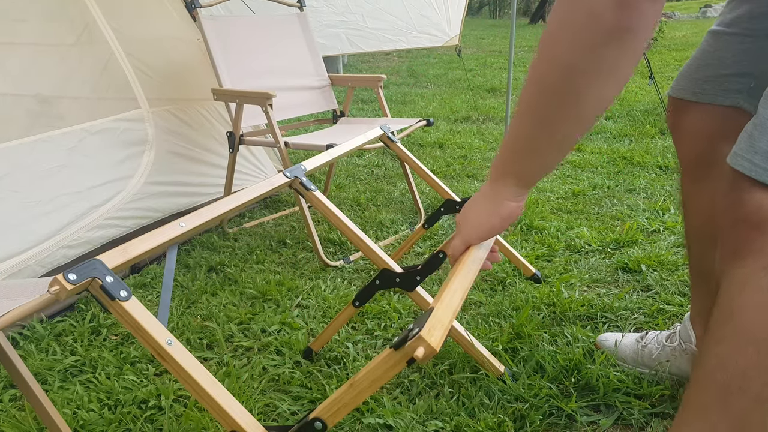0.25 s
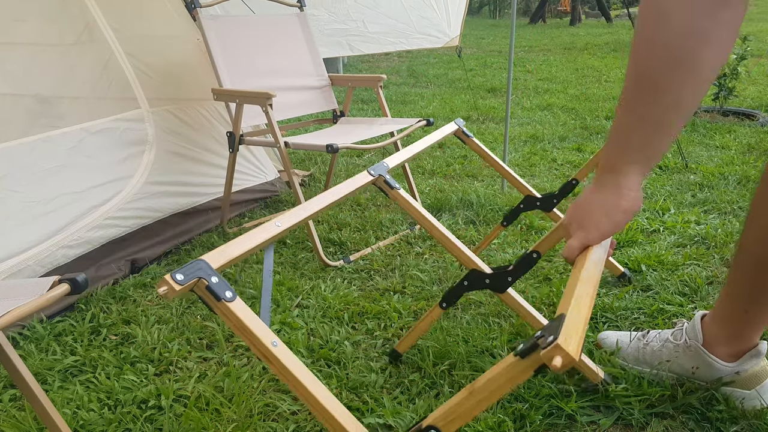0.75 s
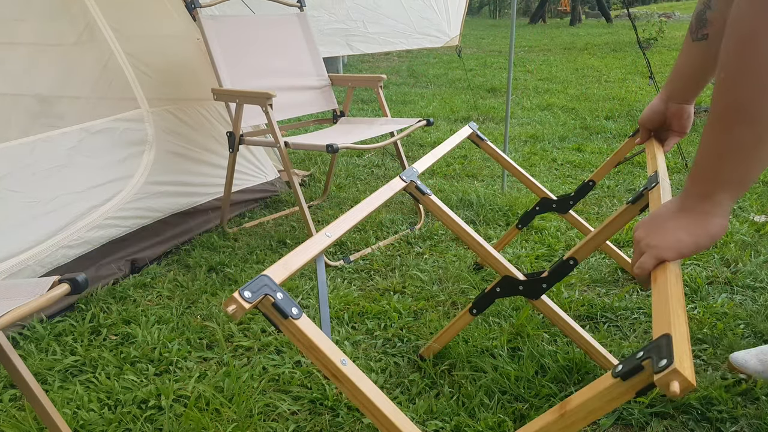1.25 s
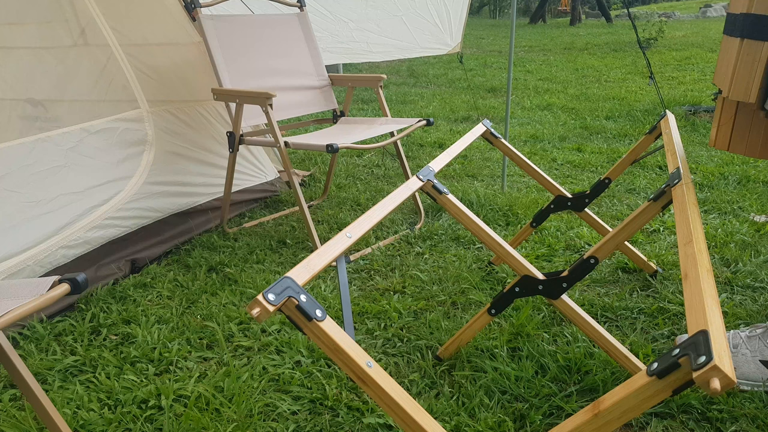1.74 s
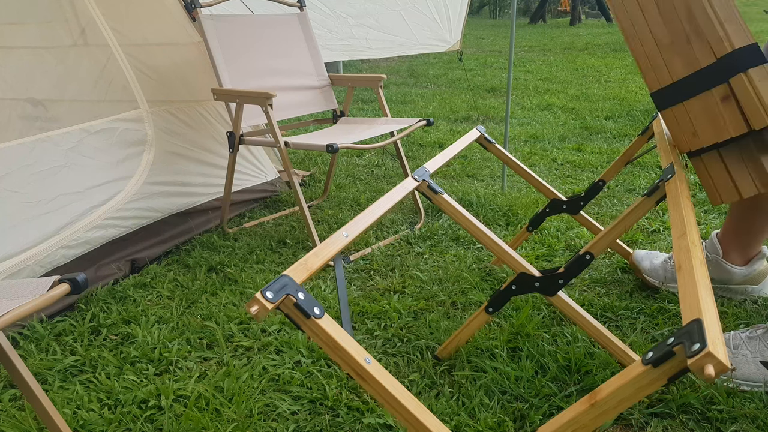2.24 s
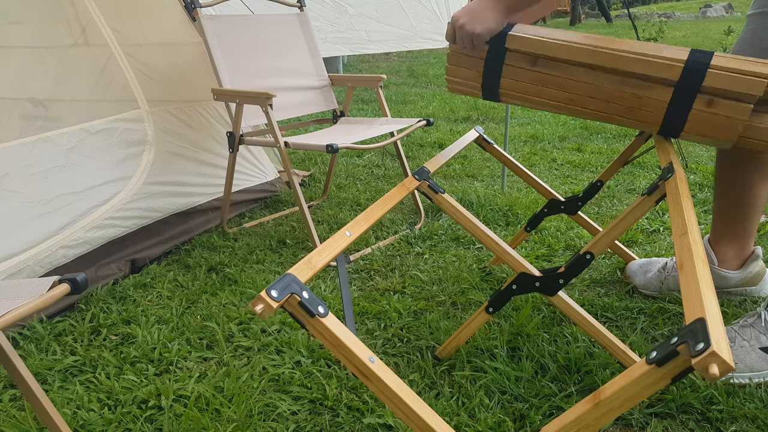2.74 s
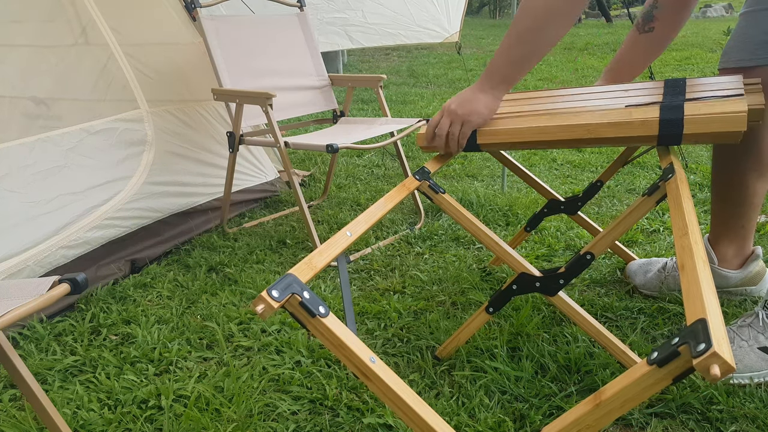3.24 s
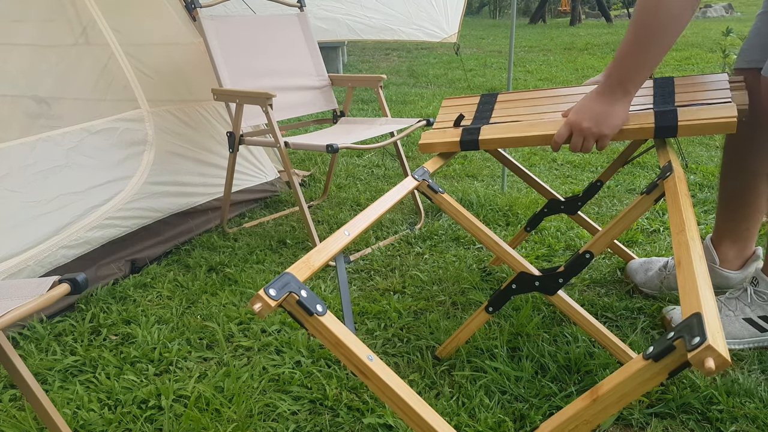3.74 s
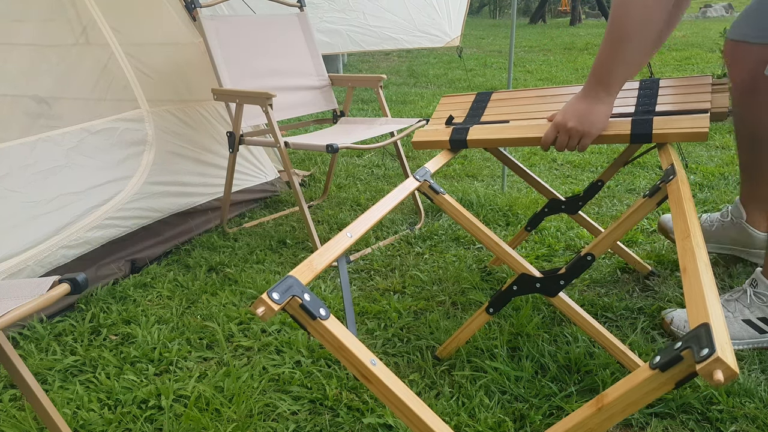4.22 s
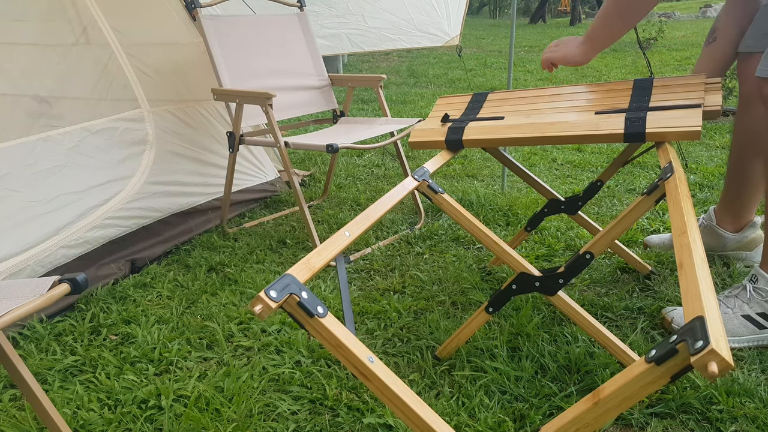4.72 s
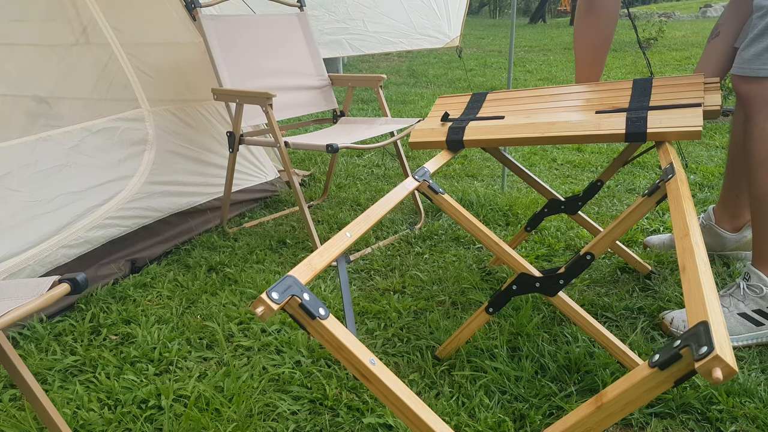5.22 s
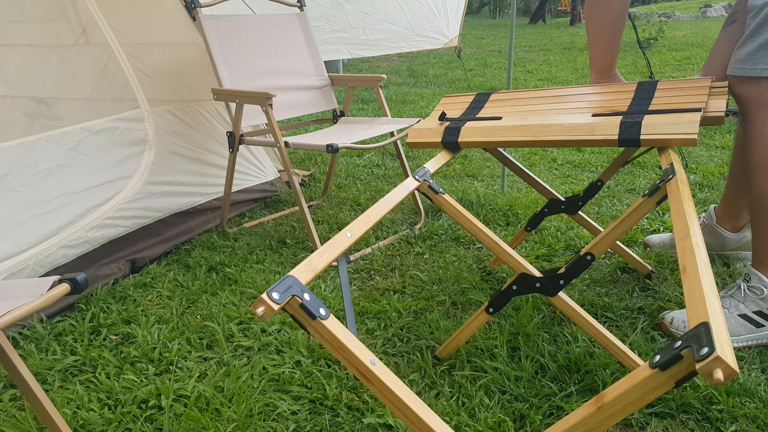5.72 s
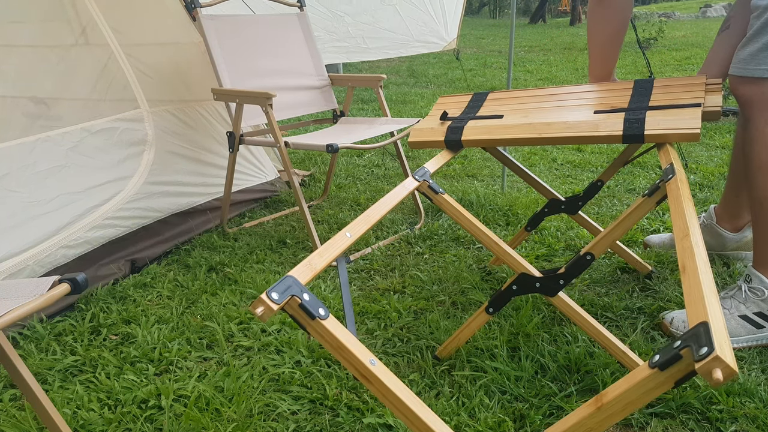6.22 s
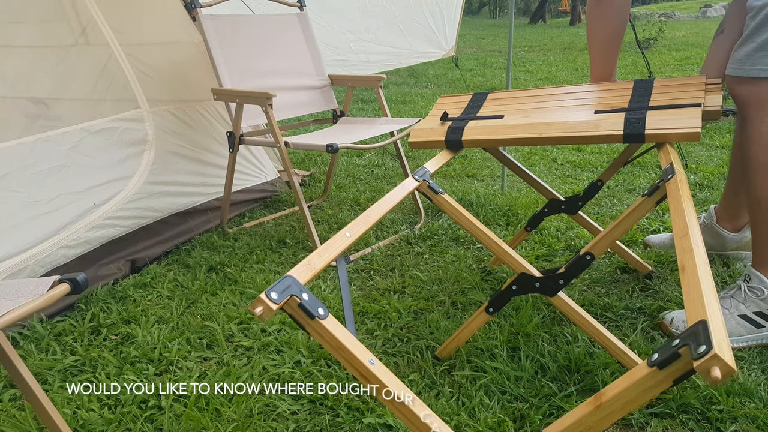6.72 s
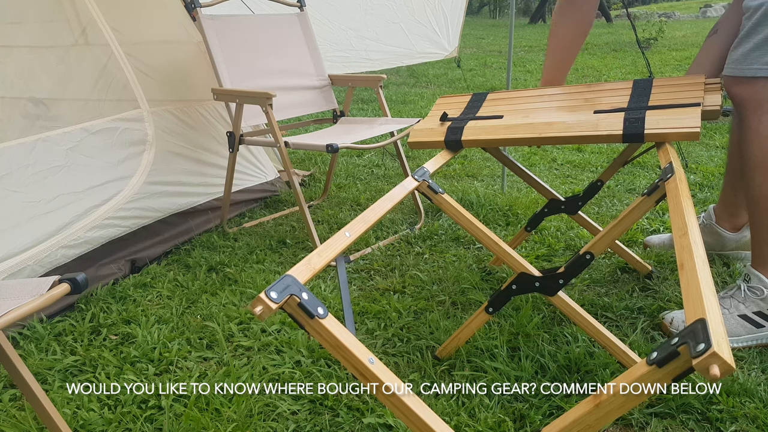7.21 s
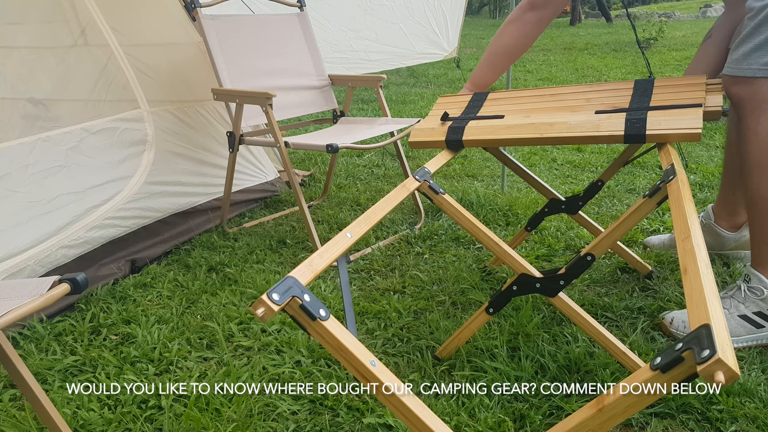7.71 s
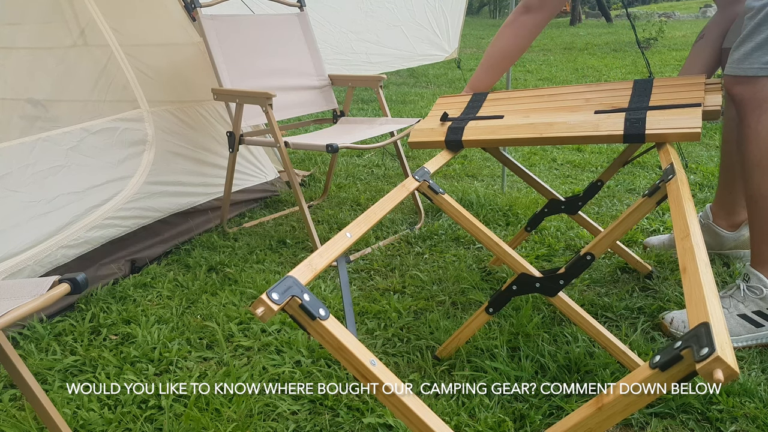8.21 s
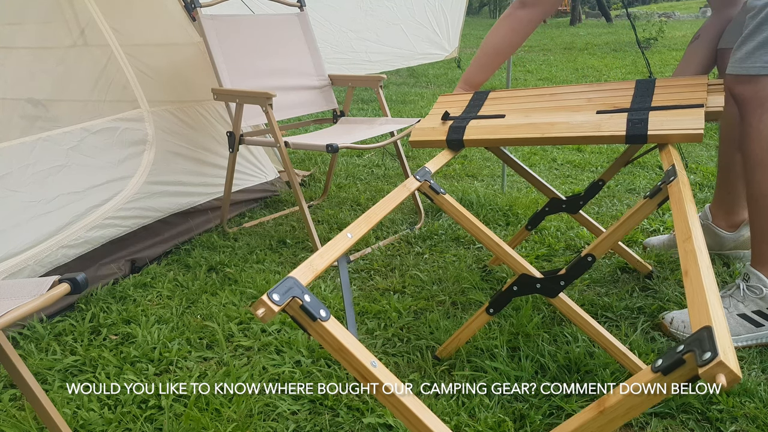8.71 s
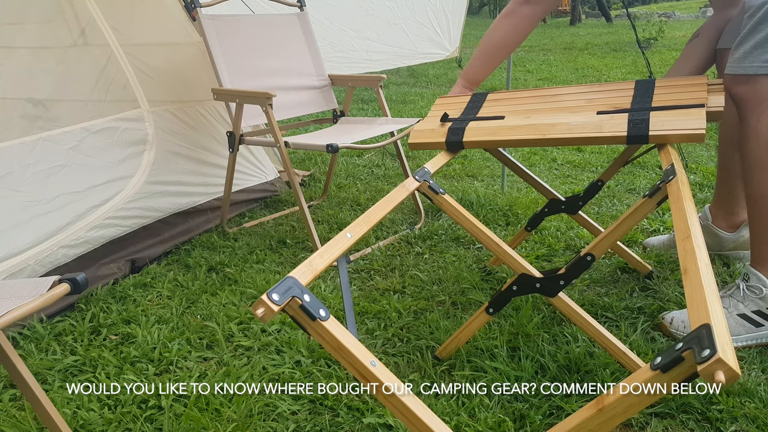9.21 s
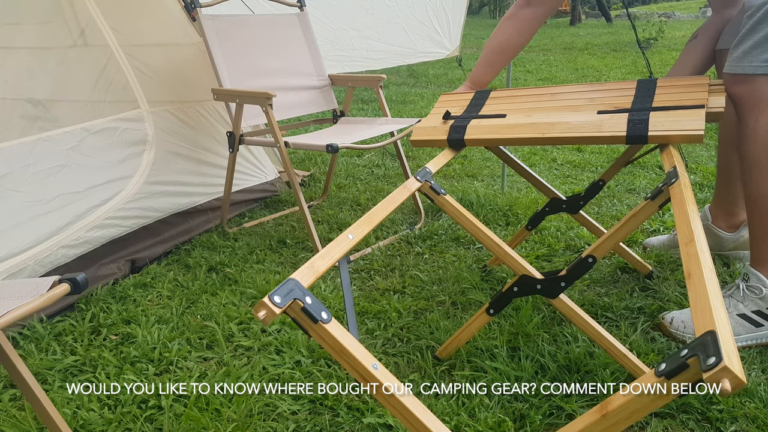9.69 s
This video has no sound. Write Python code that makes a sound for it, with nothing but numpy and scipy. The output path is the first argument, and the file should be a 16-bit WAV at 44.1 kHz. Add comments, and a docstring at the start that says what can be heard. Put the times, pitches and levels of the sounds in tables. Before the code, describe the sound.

Close stereo pickup on an open lawn. Legs swish through grass with small ticks and a faint hinge rub, then a strapped bundle of wooden slats rattles and lands on a wooden frame with hard, dry clacks. It scrapes and knocks as it is adjusted, then only small taps remain while wind rumbles on the microphone and an insect rasps far off.

```python
"""A wooden folding table is set up on a lawn: a strapped bundle of slats knocks, clatters and slides on
the rails, each contact ringing random touches or slips through the modes of the wood. Coloured clicks make
the legs' swish through the grass, with ticks, dull thuds in the turf, rubbing hinges and a palm on the rail.
Slow random swells of low noise buffet the two microphone ports, a far insect rasps in bouts of filtered
noise, and a faint trill, a thin wavering tone and still air lie behind."""
import sys
import numpy as np
from scipy import signal
from scipy.fft import rfft, irfft, next_fast_len
from scipy.io import wavfile
from scipy.ndimage import uniform_filter1d, map_coordinates

SR = 44100
rng = np.random.default_rng(int(sys.argv[2]) if len(sys.argv) > 2 else 0)


def transcribe(signal):
    """Save signal, clipped to [-1, 1], as a 16-bit WAV file at the path in sys.argv[1]."""
    frames = np.atleast_2d(signal).T
    limited = np.clip(frames, -1, 1)
    pcm = np.round(limited * 32767).astype(np.int16)
    wavfile.write(sys.argv[1], SR, pcm)


N = 438794

# Knocks of slats and frame. Each row: start in seconds, level in dB (rms over 20 ms), contact hardness in Hz,
# low thump in dB, clack of loose slats in dB, chatter time in seconds.
BLOWS = [(0.558, -47.5, 4930, 3.5, -10, 0.0093), (1.617, -49, 1580, 2.5, 2, 0.0075),
         (2.054, -53, 2150, 37, 5, 0.0011), (2.108, -44, 835, -9, 4, 0.0059),
         (2.133, -40, 1740, -10, 0, .004), (2.173, -38.5, 2330, -18, -3, .0004),
         (2.201, -25, 9150, -5, -10, 0.00027), (2.209, -28.5, 5000, 1, -5, 0.00092),
         (2.245, -33, 2030, 2, -1, 0.0044), (2.276, -34.5, 1400, 12, -3, 0.0099),
         (2.304, -33, 1390, 2.5, 0, 0.0035), (2.345, -38, 1840, -10, 1, 0.005),
         (2.359, -29.5, 3360, 4, -8, 0.0005), (2.405, -42, 1130, 22, -8, 0.0041),
         (2.464, -42, 1046, 12, -11, 0.0017), (2.536, -36, 1660, 16, -16.5, 0.0015),
         (2.647, -41.5, 1560, 20, -16, 0.0025), (2.678, -38.5, 2006, 6.5, 5, 0.0017),
         (2.767, -38.5, 1530, 11.5, 2.5, 0.0023), (2.866, -18.5, 5500, 1.5, -2, .0045),
         (2.883, -19, 8340, -7.5, 7, 0.0026), (2.91, -32.5, 5760, 12, -9, 0.00054),
         (2.961, -24, 8450, -5, 2, 0.0039), (2.971, -32, 6850, -10, -10, 0.0014),
         (3.133, -43, 2200, -5.5, -0.5, 0.00029), (3.181, -50.5, 1060, 32, 0, 0.0019),
         (3.22, -33.5, 2340, 5.5, -1, 0.0024), (3.239, -36.5, 2000, 12, -13, 0.0072),
         (3.337, -52.5, 840, 8, -6, 0.0003), (3.484, -46, 1300, 3, -5, 0.0024),
         (3.505, -41, 1140, 4.5, -1, 0.00067), (3.816, -33.5, 1340, -16, -3.5, 0.00069),
         (3.904, -39.5, 1670, -2.5, 1, 0.0037), (4.019, -34.5, 1100, -8.5, -8.5, 0.0011),
         (4.106, -56.5, 910, 12.5, 8, 0.00032), (4.241, -51.5, 3850, 13.5, -9, 0.0044),
         (4.321, -42.5, 1200, -0.5, 1, 0.0029), (4.732, -57, 2735, 15.5, 10.5, 0.0019),
         (5.321, -39.5, 2050, -2.5, -3.5, 0.00018), (5.356, -40, 2090, -4, -1.5, 0.00076),
         (5.656, -37.5, 2210, -5, -2, 0.0018), (5.665, -29.5, 2900, -7.5, -0.5, 0.0018),
         (5.681, -32.5, 4060, -5, 3.5, 0.0019), (5.743, -50, 2920, 10, 2, 0.0025),
         (5.996, -45, 1130, -9, -1, 0.00021), (6.12, -47.5, 2220, 17, 2.5, 0.0019),
         (6.766, -41.5, 1727, -20.5, -3, 0.00048), (7.365, -54.5, 869, 15.5, 6, 0.005),
         (7.572, -45, 853, -7, -10.5, 0.001), (7.935, -57.5, 892, 6, -7, 0.0014),
         (8.303, -43.5, 834, -3.5, -4.5, 0.0011), (8.513, -59, 1200, 6.5, 0.5, 0.0022),
         (8.605, -50.5, 2230, 12, -11, .002), (8.843, -46.5, 1295, -15, -12.5, 0.00037),
         (8.928, -50.5, 1380, -14.5, -18, 0.00094), (9.044, -50.5, 1450, -3, -10, 0.00034),
         (9.84, -52, 1060, -9, -5, 0.00036)]
# Colour of grass, cloth and snapping stalks. Each row: frequency in Hz, relative level in dB.
GRASS_COLOUR = [(180, -34), (400, -18), (800, -12.5), (1300, -6.5), (2400, -6.5), (4000, -2.5), (6300, -2),
                (8000, -4), (10000, 1.5), (13500, 3.5), (16000, 1.5)]


def knock(db, hard_hz, thump_db, clack_db, chatter_s, contacts_per_s=2200, first_touch=0.22,
          thump_hz=800, clack_hz=2400, clack_octaves=0.62):
    """Loose slats meet in a swelling run of quick touches; a soft contact loses the treble."""
    # Overall colour of a hard blow on the wood. Each row: frequency in Hz, relative level in dB.
    blow_colour = [(60, -6), (150, -12.5), (300, -4.5), (600, -1), (850, -1.5), (1150, -5.5), (1600, -2),
                   (2400, -1.5), (4000, -5.5), (6300, -9.5), (8000, -18), (10000, -12), (15500, -21)]
    ring = wood_ring()
    t, hz = np.arange(ring.shape[1]) / SR, bins(ring)
    pressure = t / chatter_s * np.exp(-t / chatter_s)
    touching = rng.random(len(t)) < contacts_per_s / SR
    touches = rng.standard_normal(len(t)) * touching * pressure
    touches[0] = first_touch
    ring = ports(signal.fftconvolve(ring, touches[None], axes=1)[:, :len(t)])
    softness = 10 * np.log10((1 + (hz / hard_hz) ** 4) * (1 + (hz / hard_hz / 3) ** 4))
    thump = thump_db / (1 + (hz / thump_hz) ** 3)
    clack = clack_db * np.exp(-(np.log2((hz + 1) / clack_hz) / clack_octaves) ** 2)
    sound = colour(ring, read(blow_colour, hz) - softness + thump + clack - broad_db(ring))
    # the level counts as if all the energy fell within 20 ms
    return amp(db) * evened(sound) * np.sqrt(.02 / t[-1])


def wood_ring(modes_db=-8.5, crack_db=0, crack_s=.0014, size=16384):
    """Answer of the wood to one tap: main modes set by the place of the tap, dense small modes, a short crack."""
    # What the wood rings with. Each row: frequency in Hz, relative level in dB, 60 dB decay in seconds.
    main_modes = [(190, -16.5, 0.038), (317, -7.5, .09), (389, -8, 0.043), (506.5, 1, 0.022),
                  (571, -2.5, 0.095), (660.4, -6, 0.12), (774.7, -10, 0.097), (888, -9.5, 0.095),
                  (989.5, -2, 0.058), (988, -9, 0.12), (1381, -2, 0.0547), (1570, -7, 0.057),
                  (1642, -3, 0.02), (2064, -4, .08), (2085, -9, 0.15), (2235, -4, 0.12), (2361, -4, .07),
                  (2590, -4, 0.15), (2770, 1, 0.1), (3148, -0.5, .1), (3786, -3.5, 0.022),
                  (3950, -1.5, 0.095), (4400, -1, 0.1), (5970, -5.5, 0.12)]
    # Decay of the many small modes. Each row: frequency in Hz, 60 dB decay in seconds.
    small_decay = [(150, 0.11), (600, 0.087), (2500, 0.08), (6000, 0.09), (14000, .04)]
    t = np.arange(size) / SR
    hz, db, t60 = np.array(main_modes).T[:, :, None]
    place = rng.uniform(0, 2 * np.pi, (2, len(hz), 1))
    modes = (amp(db - 60 * t / t60) * np.sin(2 * np.pi * hz * t + place)).sum(1)
    # dense modes: noise that fades at its own pace in each frequency band
    f, frames, z = signal.stft(rng.standard_normal((2, size)), SR, nperseg=128)
    fade = amp(-60 * frames / read(small_decay, f)[:, None])
    dense = signal.istft(z * fade, SR, nperseg=128)[1][:, :size]
    crack = rng.standard_normal((2, size)) * np.exp(-t / crack_s)
    return amp(modes_db) * evened(modes) + evened(dense) + amp(crack_db) * evened(crack)


def broad_db(x, size=331):
    """Broad tilt of a ring; taking it out leaves the single modes standing."""
    power = uniform_filter1d((abs(rfft(x)) ** 2).mean(0), size)
    return 10 * np.log10(np.maximum(power / power.mean(), 1e-6))


def slides(slips_per_s=2500, spread_db=3.8, judder_db=1.66, judder_s=.013, shift_s=.12,
           scuff_db=-17.5, scuff_rise_s=.02, scuff_fall_s=.06):
    """Tiny slips of wood on wood excite its modes; their mix shifts as the contact travels."""
    # Shoves of wood over the rails and on itself.
    # Each row: peak, rise and fall in seconds, level in dB before the judder.
    shoves = [(2.14, 0.051, 0.021, -43), (2.28, .08, 0.35, -47.5), (2.8, 0.21, .27, -50.5),
              (3.14, 0.07, 0.084, -48.5), (3.25, 0.046, 0.036, -41), (3.42, .1, 0.12, -62.5),
              (3.84, 0.2, 0.14, -36.5), (4.33, 0.1, 0.067, -55.5), (5.35, 0.032, 0.092, -48.5),
              (5.66, 0.15, 0.052, -43), (5.95, 0.12, 0.11, -42.5), (6.14, 0.25, 0.15, -53.5),
              (6.655, 0.036, 0.08, -57.5), (8.63, .25, 0.16, -66), (8.9, 0.31, 0.31, -60),
              (9.72, 0.14, 0.19, -55.5)]
    # Each row: frequency in Hz, relative level in dB.
    shove_colour = [(100, -23), (300, -3), (550, 2), (780, 2), (1150, -8), (1550, -4.5), (2100, -10),
                    (3200, -18.5), (4500, -20), (6300, -27), (8000, -32), (15000, -42)]
    turn = wander(shift_s)
    rub = 0
    for share in (np.cos(turn), np.sin(turn)):
        ring = wood_ring()
        ring = colour(ring, -broad_db(ring))
        slips = share * grains(slips_per_s, spread_db)
        rub = rub + signal.oaconvolve(slips, ring, axes=1)[:, :N]
    # every knock also scuffs the wood briefly, scuff_db against the knock
    scuffs = [(s, scuff_rise_s, scuff_fall_s, db + scuff_db) for s, db, *_ in BLOWS]
    level = strokes(list(shoves) + scuffs) * amp(judder_db * wander(judder_s))
    return level * tinted(ports(rub), shove_colour)


def rail(width_hz=190, slips_per_s=2500, spread_db=2):
    """Friction drives one bending resonance, which moves with the point of contact."""
    # The rail hums while the bundle is pushed along it.
    # Each row: time in seconds, level in dB, resonance in Hz.
    hum_path = [(5.809, -86, 709), (5.87, -50, 730), (5.92, -45, 844), (5.97, -52, 880), (6.03, -76, 830),
                (6.11, -59, 750), (6.281, -91.5, 760)]
    s, db, hz = np.transpose(hum_path)
    t, r = np.arange(N) / SR, np.exp(-np.pi * width_hz / SR)
    # shift the slips down by the moving pitch, filter them around zero Hz, shift them back up
    turn = np.exp(2j * np.pi * np.cumsum(np.interp(t, s, hz)) / SR)
    slips = grains(slips_per_s, spread_db) / turn
    hum = (turn * signal.lfilter([1], [1, -2 * r, r * r], slips)).real
    level = amp(np.interp(t, s, db, left=-140, right=-140))
    return level * evened(ports(hum))


def swish(blades_per_s=5000, spread_db=2.0, flutter_db=2.0, flutter_s=.023):
    """Countless blades of grass and folds of cloth brush past, as a dense rain of coloured clicks."""
    # Sweeps of legs and clothes through the grass.
    # Each row: peak, rise and fall in seconds, level in dB before the flutter.
    sweeps = [(.2, .6, 0.32, -60), (.36, 0.099, 0.11, -48), (.52, 0.25, 0.18, -45), (.78, 0.29, 0.27, -48),
              (1.02, 0.23, 0.068, -51.5), (1.24, 0.42, 0.13, -53.5), (1.59, 0.29, 0.067, -51.5),
              (1.7, 0.12, 0.16, -62), (2.28, 0.4, 0.66, -55), (3.24, 0.042, 0.06, -56),
              (3.66, 0.37, 0.22, -59.5), (4.11, 0.45, .1, -64.5), (4.3, .1, 0.15, -59.5),
              (8.42, 0.18, 0.14, -65.5), (8.8, 0.24, 0.11, -67.5), (9.04, 0.051, 0.077, -62.5),
              (9.74, 0.22, 0.11, -72)]
    level = strokes(sweeps) * amp(flutter_db * wander(flutter_s))
    return level * tinted(ports(grains(blades_per_s, spread_db)), GRASS_COLOUR)


def ticks(level_db=3, decay_s=0.0057):
    """Short bright snaps: bursts of noise that die away at once."""
    # Stalks snapping and hinges ticking. Each row: start in seconds, peak in dB before level_db.
    snaps = [(0.443, -34.5), (0.566, -34), (0.5766, -31.5), (0.7915, -34), (1.0127, -40.5), (2.201, -19),
             (2.21, -25), (3.3977, -51), (3.43, -53)]
    out, t = np.zeros((2, N)), np.arange(2048) / SR
    for s, db in snaps:
        snap = tinted(rng.standard_normal((2, len(t))) * np.exp(-t / decay_s), GRASS_COLOUR)
        add(out, s, amp(db + level_db) * snap / abs(snap).max())
    return out


def thuds(decay_s=.045, onset_s=.0017, size=16384):
    """Soft ground takes the weight with a dull, short push."""
    # The legs press into the turf. Each row: start in seconds, relative level in dB.
    presses = [(0.557, -56), (1.621, -59), (2.873, -40)]
    # Each row: frequency in Hz, relative level in dB.
    turf_colour = [(30, -23), (70, -5.5), (130, 4.5), (230, -1), (380, -4), (700, -27), (2000, -62.5)]
    out, t = np.zeros((2, N)), np.arange(size) / SR
    for s, db in presses:
        push = tinted(ports(rng.standard_normal((2, size))), turf_colour)
        add(out, s, amp(db) * push * np.exp(-t / decay_s) * (1 - np.exp(-t / onset_s)) * 2)
    return out


def hinge(level_db=-1, slips_per_s=3000, spread_db=3):
    """Dry friction in the pivots rings the metal plates."""
    # The hinges rub as the frame spreads.
    # Each row: peak, rise and fall in seconds, level in dB before level_db.
    rubs = [(.56, 0.23, 0.075, -58.5), (.793, 0.027, 0.015, -47), (.85, 0.27, 0.2, -62)]
    # Each row: frequency in Hz, width in Hz, relative level in dB.
    plate_modes = [(1500, 51, -35), (2430, 110, 5), (3240, 86, 5), (3740, 78, 3)]
    slips = ports(grains(slips_per_s, spread_db))
    plates = sum(amp(db) / (1 + 2j * (bins(slips) - hz) / width) for hz, width, db in plate_modes)
    return amp(level_db) * strokes(rubs) * evened(waveform(spectrum(slips) * plates, N))


def palm(slips_per_s=5000, spread_db=2):
    """Skin on varnish: a soft, even rub of many small slips."""
    # A palm rubs along the rail. Each row: peak, rise and fall in seconds, level in dB.
    palm_rubs = [(1.1, 0.27, 0.27, -60.5)]
    # Each row: frequency in Hz, relative level in dB.
    skin_colour = [(100, -21), (300, -10), (700, -6), (1250, -1), (1800, -10), (4000, -8.5), (15000, -46)]
    return strokes(palm_rubs) * tinted(ports(grains(slips_per_s, spread_db)), skin_colour)


def wind(breeze_pan_db=-1.5, lumps_db=3, lump_s=.085, eddies_db=3.5, eddy_s=.03):
    """A light breeze with stronger gusts; its eddies push on each port separately."""
    # The breeze on the microphone. Each row: time in seconds, level in dB before pan, lumps and eddies.
    breeze_path = [(0, -65), (1.5, -68.5), (2.2, -56.5), (3.9, -54), (5.002, -58.5), (6.4, -55), (7.1, -59),
                   (8.3, -51), (9.95, -51.5)]
    # The strong gusts. Each row: peak in seconds, rise and fall (one value) in seconds,
    # level in dB before the eddies, left minus right in dB.
    gust_rows = [(1.659, 0.26, -58.5, 5), (2.25, 0.086, -43, 2), (2.55, .08, -48, 10),
                 (3.679, 0.28, -48.5, -1), (4.32, 0.23, -49, 2), (4.74, 0.22, -54.5, -9.5),
                 (5.359, .15, -46, 1.5), (5.68, 0.27, -50, -7), (6.05, 0.11, -45, -9.5),
                 (6.62, 0.32, -46, -4), (7.532, 0.17, -45.5, -1), (8.49, 0.32, -43.5, -7.5),
                 (8.78, 0.18, -41, 2), (8.871, 0.035, -42.5, -28.5), (9.022, 0.1, -43, -22),
                 (9.159, 0.032, -31.5, 11), (9.28, 0.096, -31.5, 1.5), (9.442, 0.45, -49.5, 19.5),
                 (9.94, 0.071, -40.5, 5.5)]
    # Each row: frequency in Hz, relative level in dB.
    wind_colour = [(15, -31), (25, -13.5), (50, 2), (80, 0.5), (120, -6.5), (200, -16.5), (320, -31.5),
                   (600, -51), (1200, -60), (3000, -91)]
    breeze_db = np.interp(np.arange(N) / SR, *np.transpose(breeze_path))
    push = []
    for side in (1, -1):  # left, right
        gusts = strokes([(s, width, width, db + side * pan / 2) for s, width, db, pan in gust_rows])
        breeze = amp(breeze_db + side * breeze_pan_db / 2 + lumps_db * wander(lump_s))
        push.append(np.hypot(breeze, gusts) * amp(eddies_db * wander(eddy_s)))
    return np.array(push) * tinted(rng.standard_normal((2, N)), wind_colour)


def insect(rasps_per_s=5.3, level_db=2, uneven_db=1, uneven_tilt_db=2.5, jitter_s=.004):
    """Evenly paced rasps in bouts, each a little different in time, strength and brightness."""
    # Each row: first and last stroke in seconds, first and last level in dB before level_db,
    # mean brightness in dB an octave.
    bouts = [(0.147, 1.22, -64, -67, 2), (1.437, 2.059, -65.5, -73.5, 2), (4.222, 6.495, -70, -66, 2.5),
             (6.755, 7.465, -68, -69.5, 4.5), (7.654, 9.926, -70, -68.5, -9.5)]
    out = np.zeros((2, N))
    for first, last, first_db, last_db, tilt_db in bouts:
        for s in np.linspace(first, last, round((last - first) * rasps_per_s) + 1):
            late, strong, bright = rng.standard_normal(3)
            db = level_db + np.interp(s, [first, last], [first_db, last_db]) + uneven_db * strong
            sound = amp(db) * rasp(tilt_db + uneven_tilt_db * bright)
            add(out, s + jitter_s * late - sound.shape[1] / 2 / SR, sound)
    return out


def rasp(tilt_db, length_s=.021, rise_per_s=1.4, pivot_hz=4200, size=8192):
    """One stroke of the wings: a noisy rasp in two bands that slide up a little."""
    # Each row: frequency in Hz, relative level in dB before the tilt.
    wing_colour = [(1500, -17), (2800, -8), (3500, -5.5), (4150, 3.5), (5200, -10.5), (6300, 1.5),
                   (7200, -10), (8200, -26)]
    t = (np.arange(size) - size / 2) / SR
    bands = [(hz, db + tilt_db * max(np.log2(hz / pivot_hz), 0)) for hz, db in wing_colour]
    noise = tinted(rng.standard_normal((2, size)), bands)
    # read the noise ever faster, so its bands rise
    place = (t + rise_per_s * t ** 2 / 2 - t[0]) * SR
    sliding = np.array([map_coordinates(side, [place], mode="wrap") for side in noise])
    return sliding * np.exp(-(t / length_s) ** 2 / 2)


def buzz(level_db=-77, centre_hz=8300, width_hz=900, beats_per_s=170):
    """A brief, high, far trill: a band of noise that beats rapidly."""
    # The row: start in seconds, end in seconds.
    trill_span = 7.35, 7.5
    t, noise = np.arange(N) / SR, rng.standard_normal((2, N))
    bell = np.exp(-((bins(noise) - centre_hz) / width_hz) ** 2)
    band = evened(waveform(spectrum(noise) * bell, N))
    swell = np.sin(np.pi * np.interp(t, trill_span, [0, 1]))
    return amp(level_db) * swell * band * (1 + np.sin(2 * np.pi * beats_per_s * t))


def whistle(peak_s=1.92, rise_s=0.59, fall_s=.33, pitch_hz=1480, sag_hz_per_s=290, waver=0.037,
            waver_s=.003, flutter_db=3.5, flutter_s=.005, level_db=-73):
    """One thin, far, wavering tone that swells and sinks."""
    sagging = pitch_hz - sag_hz_per_s * (np.arange(N) / SR - peak_s)
    pitch = sagging * (1 + waver * wander(waver_s))
    level = strokes([(peak_s, rise_s, fall_s, level_db)]) * amp(flutter_db * wander(flutter_s))
    return np.sqrt(2) * level * np.sin(2 * np.pi * np.cumsum(pitch) / SR)


def still_air(level_db=-66):
    """Still outdoor air: steady coloured noise, separate in the two ports."""
    # Each row: frequency in Hz, relative level in dB.
    air_colour = [(30, 6.5), (80, 12.5), (200, 23), (400, 10), (1000, 3), (2500, 0), (5000, -4.5),
                  (7000, -2), (8300, -11), (10000, -4.5), (15500, -2.5)]
    return amp(level_db) * tinted(rng.standard_normal((2, N)), air_colour)


def campsite(x, wet_db=-28, t60=0.29, dull_hz=3500):
    """Tents and trees scatter a weak, dull tail back, from 20 ms on."""
    t = np.arange(SR) / SR
    tail = rng.standard_normal((2, SR)) * amp(-60 * t / t60) * (t > .02)
    tail = colour(tail, -10 * np.log10(1 + (bins(tail) / dull_hz) ** 4))
    return x + amp(wet_db) * signal.oaconvolve(x, tail / np.linalg.norm(tail[0]), axes=1)[:, :N]


def ports(pair, lag_s=.00018):
    """Two unrelated signals become the two microphone ports: alike in the bass, the left later by lag_s."""
    # Likeness of the two ports. Each row: frequency in Hz, likeness from 0 to 1.
    likeness = [(200, 1), (700, .93), (1500, 0.6), (3000, 0.2), (8000, 0)]
    hz, (a, b) = bins(pair), spectrum(pair)
    same = np.clip(read(likeness, hz), 0, 1)
    mid, side = a * np.sqrt(1 + same), b * np.sqrt(1 - same)
    left = (mid + side) * np.exp(-2j * np.pi * hz * lag_s)
    return waveform(np.array([left, mid - side]), pair.shape[1]) / np.sqrt(2)


def stroke(peak_s, rise_s, fall_s, db, depth_db=18.5, roundness=1.3):
    """Power of one movement: it swells to a peak and dies, depth_db down at its rise and fall times."""
    t = np.arange(0, N, 64) / SR - peak_s
    away = np.maximum(-t / rise_s, t / fall_s)
    return amp(db - depth_db * abs(away) ** roundness) ** 2


def strokes(rows):
    """Gain at every sample of a series of movements, whose powers add."""
    power = sum(stroke(*row) for row in rows)
    return np.interp(np.arange(N), np.arange(0, N, 64), np.sqrt(power))


def grains(per_s, spread_db):
    """Random clicks of uneven size, for two channels."""
    size = amp(spread_db * np.minimum(rng.exponential(1, (2, N)), 4)) * rng.choice([-1, 1], (2, N))
    return evened(size * (rng.random((2, N)) < per_s / SR))


def wander(seconds):
    """Random drift of rms 1, in straight lines between knots this far apart."""
    knots = np.arange(0, N / SR + seconds, seconds)
    return evened(np.interp(np.arange(N) / SR, knots, rng.standard_normal(len(knots))))


def amp(db):
    """Amplitude factor of a level in dB."""
    return 10 ** (np.asarray(db) / 20)


def evened(x):
    """Scales to rms 1."""
    return x / np.sqrt(np.mean(x ** 2) + 1e-30)


def read(points, hz):
    """Reads a spectrum on a log-frequency axis."""
    f, value = np.transpose(points)
    return np.interp(np.log(hz + 1), np.log(f), value)


def bins(x):
    """Frequencies of spectrum(x)."""
    return np.fft.rfftfreq(next_fast_len(x.shape[-1]), 1 / SR)


def spectrum(x):
    """Fourier transform, padded to a fast length."""
    return rfft(x, next_fast_len(x.shape[-1]))


def waveform(z, size):
    """Inverse of spectrum, cut to size samples."""
    return irfft(z, next_fast_len(size))[..., :size]


def colour(x, db):
    """Causal (minimum-phase) filter with the gain db at each of x's frequencies."""
    size = next_fast_len(x.shape[-1])
    cepstrum = irfft(np.log(amp(db)), size)
    cepstrum[1:size // 2] *= 2
    cepstrum[size // 2 + 1:] = 0
    return waveform(spectrum(x) * np.exp(rfft(cepstrum)), x.shape[-1])


def tinted(x, points):
    """Filters x by a colour table, at rms 1."""
    return evened(colour(x, read(points, bins(x))))


def add(mix, s, sound):
    """Adds a sound into the mix from s seconds on."""
    part = mix[:, max(round(s * SR), 0):][:, :sound.shape[1]]
    part += sound[:, :part.shape[1]]


def scene():
    """The wood with its scattered tail, then the smaller sounds of the setting up, then the outdoors."""
    wood = slides() + rail()
    for s, *blow in BLOWS:
        add(wood, s, knock(*blow))
    table = campsite(wood) + thuds() + palm() + hinge() + swish() + ticks()
    return table + wind() + insect() + buzz() + whistle() + still_air()


def record(dry, edge_hz=15950):
    """The recorder's band limit: a steep low-pass."""
    low_pass = signal.firwin(511, edge_hz, window=("kaiser", 9), fs=SR)
    return signal.oaconvolve(dry, low_pass[None], "same")


dry = scene()
out = record(dry)
transcribe(out)
```